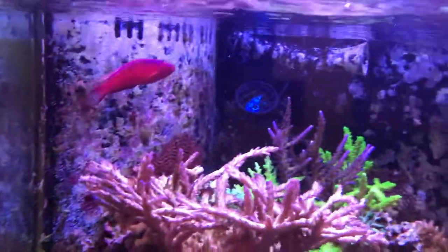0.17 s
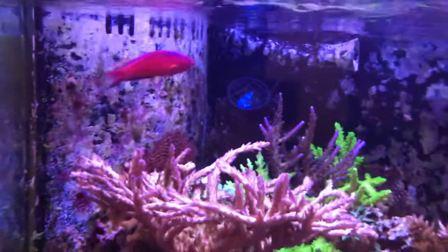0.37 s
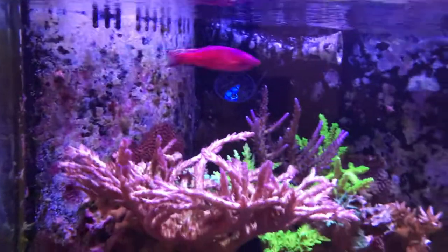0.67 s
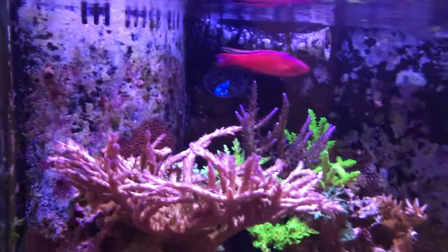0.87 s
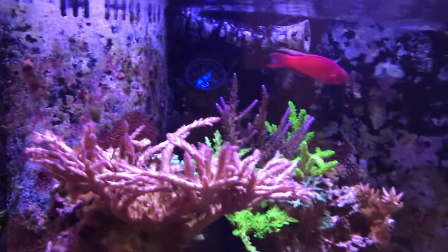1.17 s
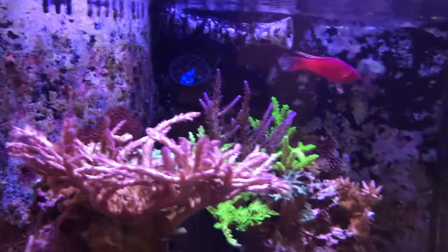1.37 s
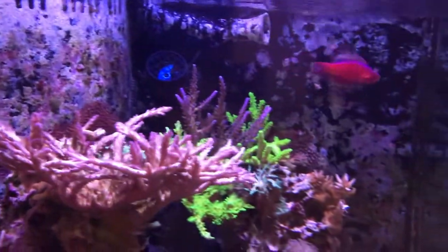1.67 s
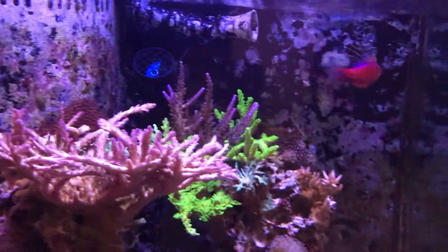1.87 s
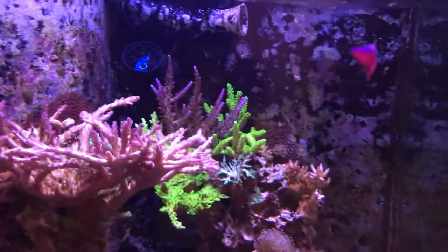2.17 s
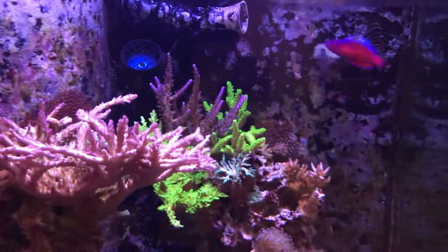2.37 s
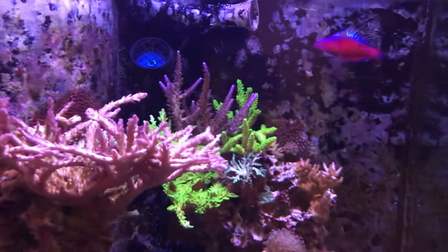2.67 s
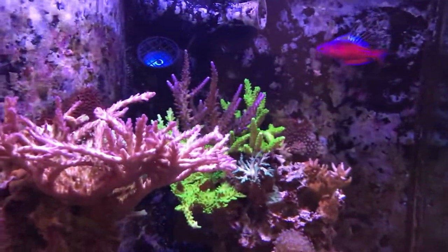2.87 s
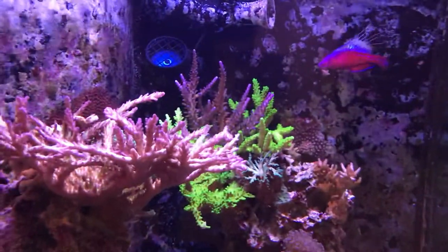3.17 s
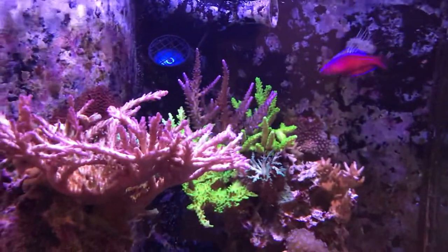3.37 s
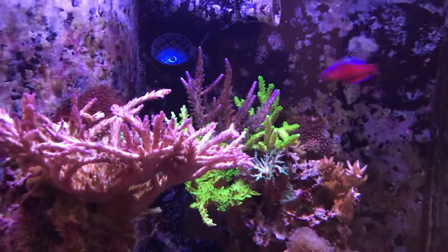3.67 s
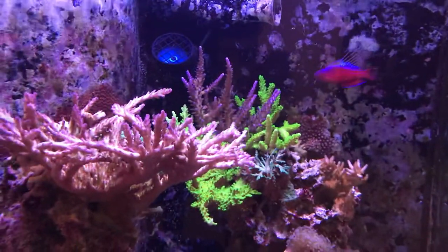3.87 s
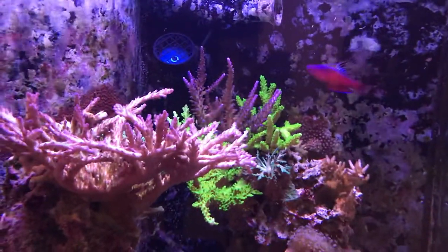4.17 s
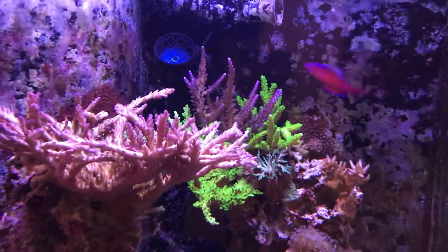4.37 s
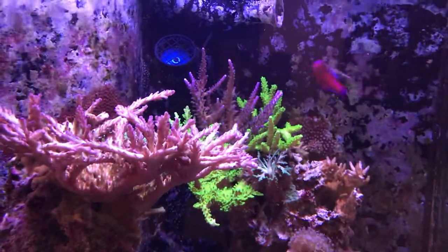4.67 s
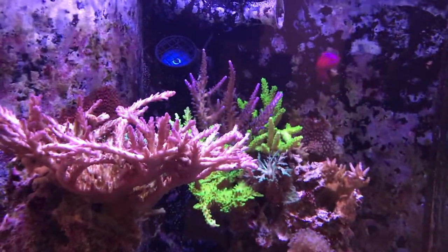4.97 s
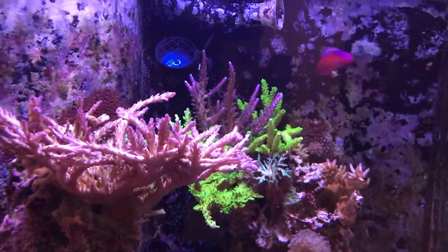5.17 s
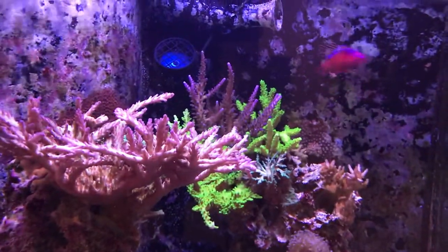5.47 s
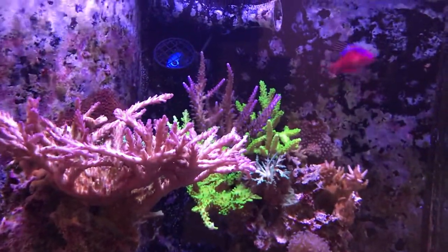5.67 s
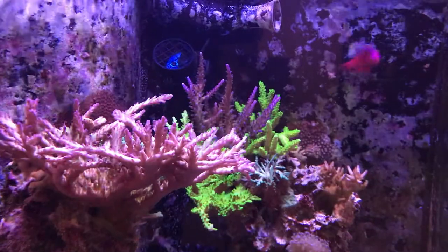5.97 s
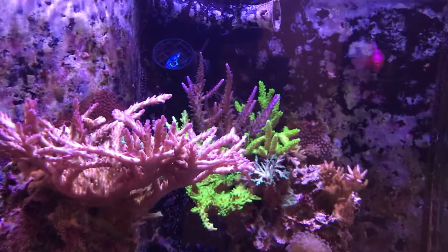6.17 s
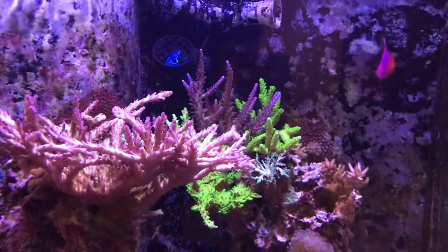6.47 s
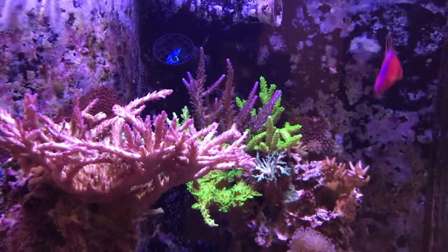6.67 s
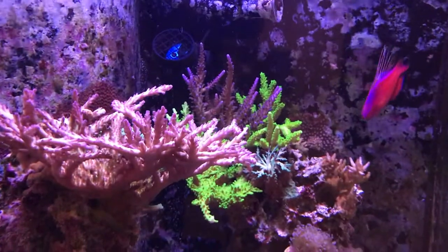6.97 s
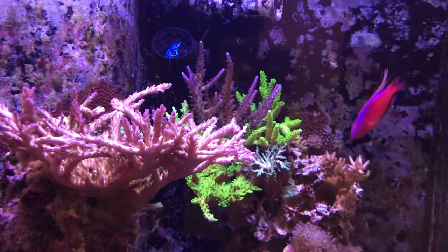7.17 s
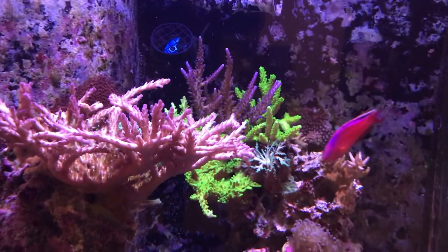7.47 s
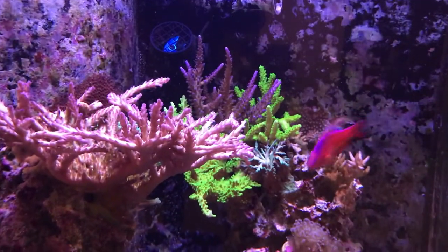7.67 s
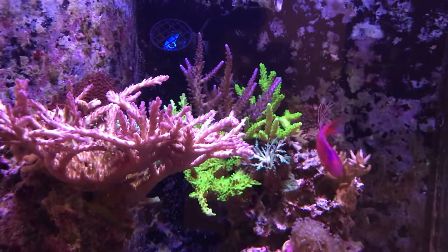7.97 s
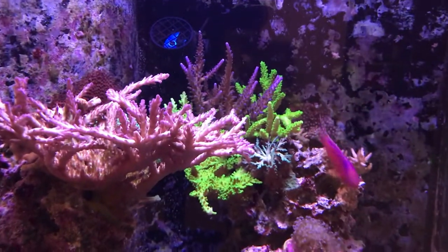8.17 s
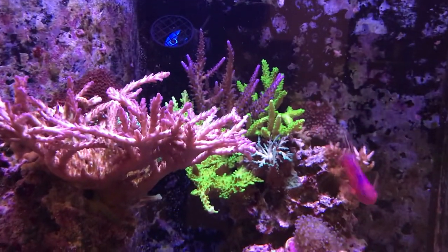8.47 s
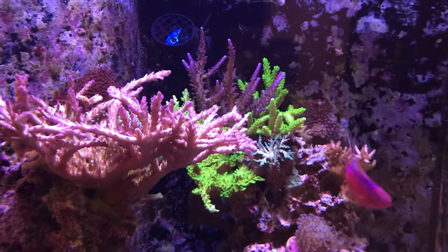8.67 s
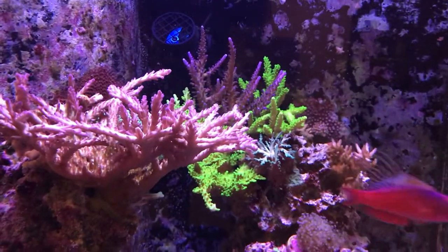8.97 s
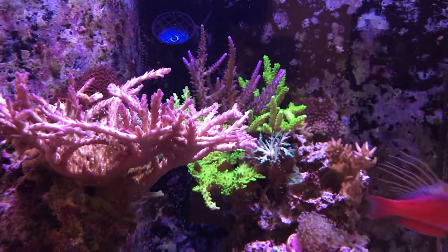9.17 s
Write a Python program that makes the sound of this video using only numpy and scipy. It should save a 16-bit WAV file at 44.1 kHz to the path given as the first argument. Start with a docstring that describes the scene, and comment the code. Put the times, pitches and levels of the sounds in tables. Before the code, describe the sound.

Water trickles, drips and bubbles in a home aquarium over a steady low pump hum, with two sharp close clicks near the start.

```python
"""In a living room, close by a reef aquarium: the microphone is near the tank, pump and cabinet hum steadily.
Filtered noise makes the wash of the water and the slosh under the hood; the hum is wavering sines.
At the rippling surface water trickles, drops splash (noise bursts) and trapped bubbles ring (gliding sines),
busiest in the middle and echoed by the tank and room. Near the start two faint and two sharp clicks
sound right at the microphone, and a few soft bumps follow; loud clicks briefly duck the bass."""
import sys
import numpy as np
from scipy import signal
from scipy.fft import rfft, irfft, next_fast_len
from scipy.io import wavfile

SR = 44100
rng = np.random.default_rng(int(sys.argv[2]) if len(sys.argv) > 2 else 0)


def pcm_store(signal):
    """Save signal as 16-bit PCM."""
    levels = np.round(np.clip(np.atleast_2d(signal), -1, 1) * 32767)
    wavfile.write(sys.argv[1], SR, levels.astype(np.int16).T)


N = 411453

# Pump hum on the mains orders: order (multiple of the mains), level/dB rms, waver (0-1)
PUMP_HUM = [(1, -69.5, .2), (2, -44.5, 0.032), (4, -65.5, .6), (6, -70, 0.37)]
# Cabinet and pipe resonances stirred by the pump: f/Hz, width/Hz, level/dB rms
CABINET_MODES = [(57.4, 5.5, -65.5), (100, 8.6, -63), (198.5, 7.3, -63.5), (218.3, 6.7, -64.5),
                 (234.8, 3.4, -69.5), (254.3, 3.3, -70), (283, 17, -69), (397.4, 9.2, -74),
                 (464, 12.5, -73), (504, 3.2, -80.5), (3564, 41, -76.5), (3930, 36, -100), (5270, 300, -77),
                 (5960, 140, -75.5)]
# Colour of the pump's rumble: f/Hz, relative level/dB per Hz
RUMBLE_COLOUR = [(22, -33), (38, -11), (55, -40), (72, -3.5), (95, -2.5), (130, 4), (155, -4.5),
                 (185, -8.5), (270, -13.5), (350, -9.5), (420, -16.5), (560, -21), (800, -25.5),
                 (1400, -43.5)]
# Colour of the moving water's hiss: f/Hz, relative level/dB per Hz
HISS_COLOUR = [(400, -4), (800, 5), (1400, 2.5), (2400, 1), (3400, 2.5), (4000, -4), (4750, -16),
               (6000, -37), (7000, -5.5), (7800, -19), (8800, -5), (10300, -33), (11500, -16.5),
               (15500, -30)]
# Air resonances under the hood: f/Hz, relative level/dB per Hz
HOOD_COLOUR = [(200, -32.5), (310, -5.5), (380, 0), (420, -12), (480, 0), (510, -2), (570, -14.5),
               (900, -22), (2000, -59)]
# Ring of the tank hood and the room: f/Hz, t60/s
ROOM_DECAY = [(300, 0.28), (1000, 0.28), (3000, 0.26), (7000, 0.32), (14000, 0.19)]
# Soft bumps: t/s, level/dB (before a common trim), f/Hz
BUMP_EVENTS = [(0.979, -43, 260), (1.142, -36.5, 254), (1.217, -45.5, 315), (1.28, -44, 270),
               (1.397, -46, 282)]
# Clicks at the microphone: t/s, snap peak level/dB, snap tilt/dB per octave, snap treble edge f/Hz,
# thud f/Hz, thud level/dB, thud t60/s, thud glide/octaves per s, ring f/Hz, ring level/dB, ring t60/s
# (levels before the low cut and the soft starts of thud and ring)
CLICK_EVENTS = [(0.159, -38, 26, 3800, 330, -35, 0.015, -3, 1050, -55, 0.026),
                (0.198, -26.5, 19, 5470, 520, -33.5, 0.022, 32, 2270, -30, 0.011),
                (0.3447, -10.5, 8.5, 12900, 126, -12, 0.029, -70, 533, -17, 0.021),
                (0.4269, -3.5, 3, 12000, 250, -10.5, 0.031, 14, 900, -41, .07)]
# Resonances of the clicking casing: f/Hz, relative level/dB per Hz (before each click's tilt)
CASING_COLOUR = [(150, -7), (560, 6), (760, 5), (970, 7), (1800, -8.5), (2300, -10), (2600, -17),
                 (2770, -29), (2950, -15), (4400, -32), (5500, -46), (6500, -27.5), (7850, -44),
                 (8750, -28), (10400, -58), (11800, -45), (15500, -46)]
# Strength of the water running over the surface: t/s, level/dB (read relative to the highest)
WATER_FLOW = [(0.6, -60.5), (2.51, -62), (2.99, -57), (3.6, -59), (4.52, -55), (4.9, -58), (5.68, -55),
              (6.01, -61), (6.26, -62), (6.399, -59.5), (6.74, -59), (7.46, -64), (9.28, -64)]
# Colour of splashing water: f/Hz, relative level/dB per Hz
WATER_COLOUR = [(480, -1.5), (740, -9), (950, -2), (1400, -7.5), (1700, -2), (2350, -3), (3200, 3),
                (4350, -4.5), (5050, -14), (6100, -2), (7800, -9), (8800, -5.5), (10400, -22.5),
                (11500, -9), (13300, -18), (15500, -12)]
# Distinct bubbles: t/s, level/dB (before the soft start), f/Hz (before wobble), glide/octaves per s
DISTINCT_BUBBLES = [(0.921, -38, 8870, 0), (0.965, -41, 2880, 0), (0.967, -39.5, 3380, 13),
                    (1.069, -39, 3600, 7), (1.089, -44.5, 1960, 1), (1.179, -40, 8800, 0),
                    (1.59, -42, 7100, 0), (1.628, -38.5, 2660, 9), (1.638, -40.5, 2860, 9),
                    (1.849, -42, 1910, 6), (1.862, -44.5, 2230, 4), (2.323, -56, 7000, -2),
                    (2.406, -52, 9150, 0), (2.435, -42, 6850, -8), (2.443, -44, 6000, 0),
                    (2.601, -45, 1066, -1), (2.606, -44, 740, 6.5), (2.633, -41.5, 877, 14),
                    (2.657, -33.5, 8100, 0), (2.717, -40, 1760, 4), (2.789, -41, 1654, -2),
                    (2.832, -38, 7020, 0), (2.882, -42.5, 910, -1), (2.888, -44, 3400, 2),
                    (2.91, -38, 2880, -2), (2.913, -32.5, 1716, 3.5), (2.931, -42, 7150, 0),
                    (2.966, -46, 1770, 0), (2.967, -45, 2060, 0), (2.988, -48, 2960, 2),
                    (3.009, -44.5, 1750, 0), (3.011, -46, 3500, -2), (3.06, -45.5, 960, -2),
                    (3.105, -38, 2570, 0), (3.104, -46, 2000, 0), (3.106, -37, 2910, 5),
                    (3.121, -33.5, 3420, 3), (3.122, -46, 3870, 0), (3.139, -43, 3400, 0),
                    (3.165, -41, 1820, 1), (3.2, -45, 2885, 0), (3.218, -51, 2570, 3), (3.31, -55, 696, 14),
                    (3.323, -49.5, 900, 8), (3.378, -42, 2900, 0), (3.4, -42, 3260, 3),
                    (3.402, -48, 940, 5), (3.414, -47, 1005, 3), (3.472, -46.5, 990, 6),
                    (3.486, -41, 4340, 0), (3.525, -47, 3500, 3), (3.539, -44, 3300, 4),
                    (3.558, -48, 3850, 3), (3.629, -40, 7360, 0), (3.632, -48.5, 773, 1),
                    (3.689, -47, 1680, 2), (3.724, -52, 1320, 8), (3.752, -39.5, 2970, 1),
                    (3.796, -45, 3070, 2), (3.865, -34.5, 7000, 0), (3.873, -46, 2885, 0),
                    (3.873, -45, 1380, 3), (3.874, -38, 5960, 0), (3.882, -44, 1820, 2),
                    (3.912, -45.5, 787, 11), (3.93, -53, 900, 8), (3.948, -53, 936, 1),
                    (3.985, -51, 1530, 4), (4.022, -38.5, 2540, 6), (4.047, -44, 4400, 6),
                    (4.09, -49, 1005, 8), (4.118, -49, 1930, 0), (4.119, -35, 7150, 0),
                    (4.138, -49, 1970, -2), (4.198, -39.5, 2930, 0), (4.209, -45, 1640, 6),
                    (4.226, -51, 1990, 3), (4.255, -46, 2870, 0), (4.314, -49, 2720, 1),
                    (4.345, -33.5, 3370, -1), (4.358, -34.5, 2790, -3), (4.377, -30.5, 3270, -5),
                    (4.417, -45, 3100, 0), (4.425, -48.5, 904, -1), (4.477, -40, 2825, 0),
                    (4.478, -28, 4110, -3), (4.484, -32, 4380, 7), (4.503, -40, 3530, -2),
                    (4.504, -39, 4300, 0), (4.528, -43, 2950, 2), (4.532, -41, 8150, 0),
                    (4.616, -40, 2825, 2), (4.617, -41, 1270, -1), (4.62, -41.5, 1035, 7),
                    (4.629, -39.5, 860, 13), (4.648, -40, 1180, 6), (4.688, -47, 896, 0),
                    (4.696, -39, 7235, 0), (4.703, -30, 970, -3.5), (4.704, -47, 1230, -1),
                    (4.721, -45, 3470, 0), (4.744, -44, 3320, 2), (4.779, -47, 1070, 2),
                    (4.808, -48, 1870, 4), (4.812, -44.5, 870, 8), (4.819, -48, 3050, 0),
                    (4.862, -44, 2060, 4), (4.913, -47, 1940, -2), (4.944, -42, 3830, -3),
                    (4.964, -47, 2070, 0), (5.002, -40, 3530, 0), (5.005, -42, 954, 0), (5.04, -48, 965, 0),
                    (5.078, -46, 2800, 3), (5.101, -48, 980, -3), (5.108, -42, 3700, 2),
                    (5.231, -44.5, 1485, -3), (5.258, -32.5, 7950, 0), (5.262, -37, 9040, 0),
                    (5.301, -43, 3790, 0), (5.323, -39, 4340, 2), (5.351, -33, 965, -7.5),
                    (5.354, -43, 2970, -2), (5.369, -35, 950, 23), (5.381, -40, 1200, 26),
                    (5.391, -40, 1480, 24), (5.4, -42, 1740, 20), (5.408, -44, 1960, 10),
                    (5.455, -31.5, 946, -1.5), (5.466, -42, 1930, 0), (5.496, -41, 1480, 0),
                    (5.497, -36.5, 2910, -1), (5.498, -41, 3400, -2), (5.559, -51, 1550, 0),
                    (5.573, -53, 1515, 0), (5.617, -46, 1810, 0), (5.624, -36.5, 3470, -2),
                    (5.625, -32, 4440, -2), (5.632, -29.5, 5930, 2), (5.687, -38, 3340, 7),
                    (5.766, -42, 2470, 4), (5.768, -43, 8270, 0), (5.771, -37, 1700, -1),
                    (5.776, -43, 2900, 2), (5.847, -43, 1256, 0), (5.848, -40, 3230, 0),
                    (6.192, -35, 3430, 1), (6.233, -36, 3500, 7), (6.237, -49, 6100, 0),
                    (6.281, -45, 4260, 0), (6.292, -36.5, 7760, 3), (6.293, -47, 966, -2),
                    (6.353, -40.5, 4400, 1), (6.38, -41, 2860, 4), (6.442, -43, 2890, -2),
                    (6.445, -42, 3530, 0), (6.475, -37, 8530, 0), (6.49, -46, 950, -1),
                    (6.578, -36, 6760, 0), (6.579, -34.5, 7030, 0), (6.589, -40.5, 3530, -2),
                    (6.656, -39.5, 7190, 0), (6.717, -36.5, 3500, 0), (6.869, -40, 3460, 1),
                    (6.869, -42, 2990, 0), (6.901, -41, 2900, 13), (6.93, -37.5, 2450, 8),
                    (7.042, -40, 8790, 0), (7.054, -44, 3920, 0), (7.303, -43, 2900, 4),
                    (7.304, -48, 1660, 1), (7.685, -41, 3450, 2), (7.703, -52, 1780, 3),
                    (7.82, -53, 2040, 4), (8.029, -39, 7040, 0), (8.09, -48, 3500, 6),
                    (8.343, -47, 1770, -1), (8.362, -49, 1830, 0), (8.435, -57, 1440, 3),
                    (8.78, -53.5, 1700, 0), (8.975, -53, 2000, 0), (9.225, -50.5, 1694, 4),
                    (9.305, -43, 2760, 2), (9.31, -35.5, 1430, 0), (9.321, -32.5, 1420, 0)]
# Loudness of the fainter bubbles by pitch: f/Hz, relative level/dB
FAINT_BUBBLE_LEVEL = [(750, -32), (950, -11), (1350, -15.5), (1750, -5.5), (2300, -8.5), (3300, 0),
                      (4000, -9)]
# Distinct drops: t/s, plop level/dB, tick level/dB, spray level/dB, fizz level/dB, decay time/s
# (levels before a common trim; each part takes its own share of the decay time)
DISTINCT_DROPS = [(0.094, -63, -55.5, -65, -73, 0.0095), (0.355, -65, -64, -57, -75.5, 0.0037),
                  (0.493, -71, -55, -62.0, -83.5, 0.0098), (0.556, -63, -56, -60, -75.0, 0.002),
                  (0.921, -66, -61.5, -56, -63, 0.0015), (1.088, -63, -55, -56, -66, 0.0032),
                  (1.85, -53.5, -71, -80, -82, 0.0044), (2.221, -76, -79, -85, -67, 0.002),
                  (2.607, -65, -64, -56.5, -81, 0.0035), (2.658, -71, -53.5, -60, -78, 0.0025),
                  (2.714, -53, -70, -60.5, -81.0, 0.0017), (2.79, -58, -76, -70, -87.0, 0.022),
                  (2.842, -67.5, -60, -54.5, -67, 0.009), (2.911, -57, -58, -60, -73.5, 0.0095),
                  (2.932, -65, -63, -60, -67, 0.0018), (2.962, -54, -56.0, -77, -82.5, 0.002),
                  (3.037, -64.0, -69, -57, -70, 0.0033), (3.086, -53.0, -53, -54, -68.0, 0.009),
                  (3.105, -52.5, -59, -58, -68.0, 0.016), (3.163, -59, -51.5, -55.5, -68.5, 0.007),
                  (3.196, -63.5, -55.5, -60, -75.5, 0.01), (3.219, -70, -68, -70, -68, 0.002),
                  (3.296, -73, -76, -64, -78, 0.014), (3.33, -58, -71, -54, -83.0, 0.0021),
                  (3.379, -53.5, -57, -57, -67, 0.017), (3.488, -63, -55.5, -56, -61, 0.0016),
                  (3.541, -71, -56, -73.5, -77.5, 0.003), (3.576, -60, -68.0, -64, -82, 0.002),
                  (3.665, -55, -59, -57.5, -73.5, 0.013), (3.69, -53.5, -61, -59, -69.0, 0.0033),
                  (3.78, -61, -60, -59, -76.5, 0.002), (3.864, -54, -53, -56, -73, 0.0011),
                  (3.95, -61, -59, -62, -78, 0.013), (3.983, -59, -68.5, -73.0, -81.5, 0.003),
                  (4.023, -56, -61, -47, -65.5, 0.002), (4.117, -54, -68.5, -57.5, -63, 0.0022),
                  (4.2, -59, -61, -55, -62, 0.006), (4.279, -79, -74, -75, -70, 0.002),
                  (4.357, -73, -67, -55, -68, 0.012), (4.378, -76, -60, -58, -72, 0.002),
                  (4.426, -62, -54, -55.5, -79.5, 0.0045), (4.478, -54.5, -51, -53, -67, 0.0077),
                  (4.531, -70, -63, -54, -58, 0.003), (4.616, -57, -47, -52, -69, 0.02),
                  (4.702, -50, -50.5, -57, -71, 0.014), (4.788, -59, -68.0, -78, -78, 0.002),
                  (4.835, -53, -61, -55.5, -72.0, 0.0076), (4.909, -63, -71, -73.0, -85.0, 0.002),
                  (4.973, -58, -52, -48, -63, 0.0055), (5.001, -58, -56, -53.5, -66.5, 0.0016),
                  (5.097, -51.5, -51, -54, -73, 0.0074), (5.164, -61, -57, -61, -78.5, 0.002),
                  (5.233, -66, -69.0, -71, -76, 0.014), (5.258, -69, -75, -57, -67.5, 0.0026),
                  (5.321, -53.5, -48.5, -58, -79, 0.022), (5.423, -59, -57, -53, -75.5, 0.0033),
                  (5.469, -53, -69, -81, -85, 0.0095), (5.497, -54, -57, -57.5, -72.5, 0.002),
                  (5.578, -61, -62, -67, -60, 0.003), (5.623, -63, -52, -49.5, -75, 0.0032),
                  (5.717, -71, -57, -56.0, -66.0, 0.0018), (5.768, -53, -52.5, -58, -73.0, 0.002),
                  (5.814, -60, -53, -54.5, -70.0, 0.005), (5.848, -57, -52, -55, -77, 0.0016),
                  (5.965, -70, -69, -58, -66, 0.0041), (5.992, -67.0, -64.5, -60.5, -75, 0.002),
                  (6.061, -57.5, -62, -65, -86.0, 0.0019), (6.191, -68, -57, -56.5, -63, 0.002),
                  (6.235, -59, -57, -53.5, -68, 0.0039), (6.28, -57, -59, -57, -70.5, 0.004),
                  (6.293, -55.5, -67, -68, -75.5, 0.0029), (6.476, -62, -67, -59, -73, 0.005),
                  (6.491, -58, -53.5, -65, -77, 0.0076), (6.578, -63, -60, -49, -68.5, 0.0017),
                  (6.657, -62, -59, -52, -60, 0.002), (6.704, -62, -63, -59, -62, 0.0048),
                  (6.738, -54, -53.5, -57, -65, 0.002), (6.783, -68, -59.5, -62, -81, 0.014),
                  (6.85, -76, -78, -61, -63, 0.0042), (6.869, -65, -65, -56, -72, 0.0026),
                  (6.962, -72, -58, -67, -85.0, 0.002), (7.042, -73.0, -62, -61, -73, 0.0093),
                  (7.18, -70, -75, -59, -88.0, 0.0032), (7.305, -58, -65, -66, -79, 0.013),
                  (7.73, -54, -65, -69, -78.0, 0.0065), (8.342, -61, -58, -66, -81.0, 0.0027),
                  (8.43, -60, -65.5, -67, -76, 0.002), (8.634, -76, -73, -62.5, -63, 0.002),
                  (8.698, -75.0, -66, -80, -67, 0.002), (9.225, -69, -68, -71.5, -75, 0.003),
                  (9.304, -54, -54, -54, -69, 0.0035)]
# The parts of every splash, in rows plop, tick, spray, fizz:
# low f/Hz, high f/Hz, lingering spatter level/dB, froth level/dB, share of the drop's decay time
SPLASH_PARTS = [(750, 2364, -27, -1, 0.72), (2325, 4860, -3, 6.5, 1.05), (4900, 9800, -34, -5, 1.12),
                (9560, 14000, -19, -6, 2.4)]

MAINS_HZ, EDGE_HZ = 59.98, 15850
RUMBLE_DB, HISS_DB = -56, -64  # rms
# Cycles until a bubble and its offspring die away; the surface damps the big, low ones a little more
RING_CYCLES, SHED_CYCLES, SURFACE_DAMPING_HZ = 72.3, 29, 280
# Each splash's own colour: rms departure before smoothing, and spacing of its peaks
SPLASH_COLOUR_DB, SPLASH_COLOUR_OCTAVES = 5.5, .16


def gain_of(db):
    """Decibels to amplitude."""
    return 10 ** (np.asarray(db) / 20)


def evened(x):
    """Scales to rms 1."""
    return x / np.sqrt(np.mean(x ** 2) + 1e-20)


def read(points, hz):
    """Reads a table on a log-frequency axis."""
    f, value = np.transpose(points)
    return np.interp(np.log(hz + 1), np.log(f + 1), value)


def add(mix, s, sound):
    """Adds a sound into the mix at time s."""
    part = mix[max(round(s * SR), 0):][:len(sound)]
    part += sound[:len(part)]


def seconds(length):
    """A time axis of the given length in seconds."""
    return np.arange(int(length * SR)) / SR


def impulse(length):
    """A single unit sample, then silence."""
    return 1. * (seconds(length) == 0)


def coloured(x, spectrum, band=(0, SR)):
    """Causal minimum-phase filter with the given spectrum, falling steeply outside the band."""
    hz = abs(np.fft.fftfreq(4096, 1 / SR)) + 1
    gain = gain_of(read(spectrum, hz)) / (1 + (band[0] / hz) ** 10) / (1 + (hz / band[1]) ** 10)
    log_gain = np.log(np.maximum(gain, 1e-5))
    # the Hilbert transform of the log gain supplies the phase
    taps = np.fft.ifft(np.exp(np.conj(signal.hilbert(log_gain)))).real
    return signal.fftconvolve(x, taps)[:len(x)]


def ring(t, hz, t60, onset, rise=0):
    """A dying sine with a soft start; its pitch glides by rise octaves per s, upwards at most one octave."""
    turns = np.cumsum(hz * 2 ** np.minimum(rise * t, 1)) / SR
    decay = np.exp(-np.log(1000) * t / t60)
    return np.sin(2 * np.pi * turns) * decay * (1 - np.exp(-t / onset))


def slow_sway(hz):
    """A slow random sway, drawn anew hz times a second and joined by straight lines."""
    return np.interp(np.arange(N) / SR * hz, np.arange(400), rng.standard_normal(400))


def flow_db(s):
    """Strength of the flow at time s, in dB relative to its fullest."""
    at, db = np.transpose(WATER_FLOW)
    return np.interp(s, at, db - db.max())


def flow_times(chance, crowding):
    """Turns even chances into moments that crowd together where the flow is strong."""
    s = np.linspace(0, N / SR, 1000)
    passed = np.cumsum(gain_of(crowding * flow_db(s)))
    return np.interp(chance, passed / passed[-1], s)


def echoes(early_db=-7, early_t60=0.06, tail_db=-5, build=0.0037):
    """Close reflections from glass and water, with the short tail of the room, as sparse random pulses."""
    t = seconds(.5)
    signs = rng.choice([-1., 1.], (2, len(t)))
    sparse = rng.random((2, len(t))) < .06
    early, late = signs * sparse * (t > .002)
    early = early * np.exp(-np.log(1000) * t / early_t60)
    # each frequency of the tail dies at its own rate
    hz, at, bins = signal.stft(late * (1 - np.exp(-t / build)), SR, nperseg=256)
    decay = np.exp(-np.log(1000) * at / read(ROOM_DECAY, hz)[:, None])
    late = signal.istft(bins * decay, SR, nperseg=256)[1][:len(t)]
    return gain_of(early_db) * early / np.linalg.norm(early) + gain_of(tail_db) * late / np.linalg.norm(late)


def room(x, wander_per_s=5, count=4):
    """The splashes wander over the surface, so their echoes fade round a circle of different paths."""
    turn = np.arange(N) / SR * wander_per_s
    shares = [np.maximum(np.cos(2 * np.pi * (turn + k / count)), 0) for k in range(count)]
    shares = np.array(shares)
    shares /= np.linalg.norm(shares, axis=0)  # constant total power
    return x + sum(signal.oaconvolve(x * share, echoes())[:N] for share in shares)


def pump_hum(waver_hz=8):
    """Magnetic hum: sines on the mains orders, each wavering in strength and phase by its own amount."""
    t = np.arange(N) / SR
    hum = 0
    for order, db, waver in PUMP_HUM:
        sway = evened(slow_sway(waver_hz) + 1j * slow_sway(waver_hz))
        carrier = np.exp(2j * np.pi * (round(order) * MAINS_HZ * t + rng.random()))
        line = carrier * (1 + waver * sway)
        hum = hum + gain_of(db) * evened(line.real)
    return hum


def cabinet():
    """Narrow resonances of cabinet and pipes: noise shaped into peaks of set width and level."""
    hz = np.fft.rfftfreq(N, 1 / SR)
    power = 0
    for centre, width, db in CABINET_MODES:
        peak = 1 / (1 + ((hz - centre) / width) ** 2) ** 2
        power = power + gain_of(db) ** 2 * peak / peak.sum()
    noise = irfft(rfft(rng.standard_normal(N)) * np.sqrt(power), N)
    return np.sqrt(power.sum()) * evened(noise)


def pump():
    """The running pump: magnetic hum, resonating cabinet and low rumble."""
    rumble = coloured(rng.standard_normal(N), RUMBLE_COLOUR, (32, SR))
    return pump_hum() + cabinet() + gain_of(RUMBLE_DB) * evened(rumble)


def hiss():
    """The even wash of circulating water, as coloured noise."""
    return gain_of(HISS_DB) * evened(coloured(rng.standard_normal(N), HISS_COLOUR))


def slosh(level_db=-66, follow=1.6):
    """The moving surface stirs the low air resonances under the hood: noise that follows the flow."""
    air = evened(coloured(rng.standard_normal(N), HOOD_COLOUR))
    return air * gain_of(level_db + follow * flow_db(np.arange(N) / SR))


def bumps(level_db=6.5, t60=0.025, onset=0.0012):
    """Dull, heavily damped bumps: short low sines."""
    t, out = seconds(.1), np.zeros(N)
    for s, db, hz in BUMP_EVENTS:
        add(out, s, gain_of(db + level_db) * ring(t, hz, t60, onset))
    return out


def clicks(thud_onset=0.00075, low_cut_hz=60, pivot_hz=1000):
    """Small knocks on the casing: a bright, quickly damped snap, a low thud and a brief ring of the struck spot."""
    t, out = seconds(.1), np.zeros(N)
    for (s, db, tilt_db, edge_hz, thud_hz, thud_db, thud_t60, thud_glide,
         ring_hz, ring_db, ring_t60) in CLICK_EVENTS:
        casing = [(hz, mode_db + tilt_db * np.log2(hz / pivot_hz)) for hz, mode_db in CASING_COLOUR]
        snap = coloured(impulse(.1), casing, (0, edge_hz))
        add(out, s, gain_of(db) * snap / abs(snap).max())
        add(out, s, gain_of(thud_db) * ring(t, thud_hz, thud_t60, thud_onset, thud_glide))
        add(out, s, gain_of(ring_db) * ring(t, ring_hz, ring_t60, thud_onset))
    low_cut = signal.butter(2, low_cut_hz, "high", fs=SR, output="sos")
    return signal.sosfilt(low_cut, out)


def tiny_bubble(hz, rise, t60_at_1khz=0.032, shortening=0.5):
    """One small bubble; the smaller it is, the higher and shorter it rings."""
    t60 = t60_at_1khz / (hz / 1000) ** shortening
    return gain_of(read(WATER_COLOUR, hz)) * ring(seconds(.04), hz, t60, 1 / hz, rise)


def trickle(level_db=-60, per_s=1300, spread_db=4, rise=3, follow=1.04, treble=0.18, spray_db=-6, count=120):
    """Many tiny bubbles of all sizes burst at random in a soft spray; both swell with the flow."""
    out = np.zeros(N)
    for hz in np.geomspace(450, 10000, count):
        grain = tiny_bubble(hz, rise * rng.uniform(0, 2.8)) * hz ** treble
        when, chance = rng.random((200, 2))[:round(per_s * N / SR / count)].T
        # few are strong: exponential spread in dB, capped
        strengths = gain_of(spread_db * np.minimum(-np.log(chance), 4))
        for s, strength in zip(when * N / SR, strengths):
            add(out, s, strength * grain)
    spray = gain_of(spray_db) * evened(coloured(rng.standard_normal(N), WATER_COLOUR))
    return (evened(out) + spray) * gain_of(level_db + follow * flow_db(np.arange(N) / SR))


def faint_bubbles(level_db=-47.5, spread_db=5, low_hz=850, high_hz=3900, rise=11, crowding=3.2,
                  follow=0.26, count=420):
    """Fainter bubbles scattered at random, loudest where the water resonates: rows like DISTINCT_BUBBLES."""
    when, pitch, weakness, climb = rng.random((count, 4)).T
    s = flow_times((np.arange(count) + when) / count, crowding)
    hz = low_hz * (high_hz / low_hz) ** pitch
    db = level_db + follow * flow_db(s) + read(FAINT_BUBBLE_LEVEL, hz) - spread_db * weakness
    return list(zip(s, db, hz, rise * climb))


def bubbles(level_db=0.0, onset=0.00044, wobble=0.026, wobble_hz=200, shed_db=-13, shed_octaves=0.565,
            shed_s=.012, count=4):
    """A trapped bubble rings at a pitch set by its size; it glides, wobbles and sheds smaller, briefer ones."""
    t, out = seconds(.12), np.zeros(N)
    for s, db, hz, rise in DISTINCT_BUBBLES + faint_bubbles():
        sway = np.interp(t * wobble_hz, np.arange(100), rng.standard_normal(100))
        t60 = RING_CYCLES / (hz + SURFACE_DAMPING_HZ)
        bubble = ring(t, hz * (1 + wobble * sway), t60, onset, rise)
        add(out, s, gain_of(db + level_db) * bubble)
        for size, delay in rng.random((count, 2)):
            shed_hz = hz * 2 ** (shed_octaves * size)
            shed = ring(seconds(.04), shed_hz, SHED_CYCLES / shed_hz, onset, rise)
            add(out, s + shed_s * delay, gain_of(db + shed_db) * shed)
    return out


def scattered_drops(level_db=(-62, -60, -64, -79), spread_db=3, decay=.007, crowding=2.4, follow=0.84, count=45):
    """Further drops scattered at random, thicker and harder in a strong flow: rows like DISTINCT_DROPS."""
    times = flow_times((np.arange(count) + rng.random(count)) / count, crowding)
    colour = 2 * rng.random((count, len(level_db))) - 0.5
    rows = []
    for s, part in zip(times, colour):
        part_db = np.array(level_db) + follow * flow_db(s) + spread_db * part
        rows.append((s, *part_db, decay))
    return rows


def recoloured(x):
    """Gives a sound random peaks and dips, as each splash throws droplets of its own sizes."""
    size = next_fast_len(len(x) + 256)
    place = np.log2(1 + np.arange(size // 2 + 1)) / SPLASH_COLOUR_OCTAVES
    departure = rng.uniform(-1, 1, 100) * np.sqrt(3) * SPLASH_COLOUR_DB
    db = np.interp(place, np.arange(100), departure)
    return irfft(rfft(x, size) * gain_of(db), size)[:len(x)]


def drops(level_db=-2.0, soft_start=.6, spatter=0.016, grain_db=3, scatter=.009, rise=3, count=20):
    """Each drop is a crackling impact and a froth of tiny bubbles; the longer splashes also start more softly."""
    t, out = seconds(0.12), np.zeros(N)
    attack = round(.015 * SR)  # the stretch whose level is set
    falling = list(DISTINCT_DROPS) + scattered_drops()
    for k, (low, high, spatter_db, froth_db, share) in enumerate(SPLASH_PARTS):
        colour = coloured(impulse(.02), WATER_COLOUR, (low, high))
        sizes = [tiny_bubble(hz, rise) for hz in np.geomspace(low, high, 40)]
        for s, *part_db, decay in falling:
            age = t / (decay * share)
            fall = np.exp(-age) + gain_of(spatter_db) * np.exp(-t / spatter)
            shape = fall * (1 - np.exp(-age / soft_start))
            noise, grain = rng.standard_normal((2, len(t)))
            crackle = signal.fftconvolve(shape * noise * gain_of(grain_db * grain), colour)[:len(t)]
            froth = np.zeros(len(t))
            for size, early, strength in rng.random((count, 3)):
                bubble = sizes[int(size * len(sizes))]
                # later bubbles are weaker
                add(froth, -scatter * np.log(early), strength * np.sqrt(early) * bubble)
            splash = evened(recoloured(crackle)) + gain_of(froth_db) * evened(froth)
            add(out, s, gain_of(level_db + part_db[k]) * splash / splash[:attack].std())
    return out


def scene():
    """Water sounds in the room over the pump; the clicks are too close to echo."""
    background = pump() + hiss() + slosh()
    knocks = bumps() + clicks()
    surface = room(trickle() + bubbles() + drops())
    return (background + knocks + surface)[None]


def record(dry, threshold_db=-32, share=0.59, recovery_db=130, attack=0.003, split_hz=350):
    """Gain control ducks the bass briefly after loud clicks, recovering in dB per s; then the band limit."""
    pole = np.exp(-1 / (attack * SR))
    power = signal.lfilter([1 - pole], [1, -pole], dry[0] ** 2)
    power_db = 10 * np.log10(power + 1e-12)
    # hold each peak, letting it fall at the recovery rate
    fall = np.arange(N) * recovery_db / SR
    held_db = np.maximum.accumulate(power_db + fall) - fall
    over_db = np.maximum(held_db - threshold_db, 0)
    duck_db = share * signal.lfilter([1 - pole], [1, -pole], over_db)
    bass = signal.sosfiltfilt(signal.butter(2, split_hz, fs=SR, output="sos"), dry)
    ducked = dry - bass + bass / gain_of(duck_db)
    low_pass = signal.firwin(511, EDGE_HZ, window=("kaiser", 9), fs=SR)
    return signal.oaconvolve(ducked, low_pass[None], "same")


dry = scene()
out = record(dry)
pcm_store(out)
```